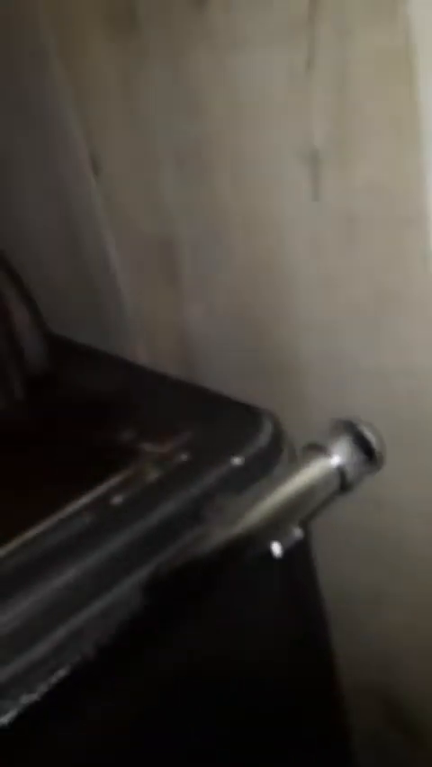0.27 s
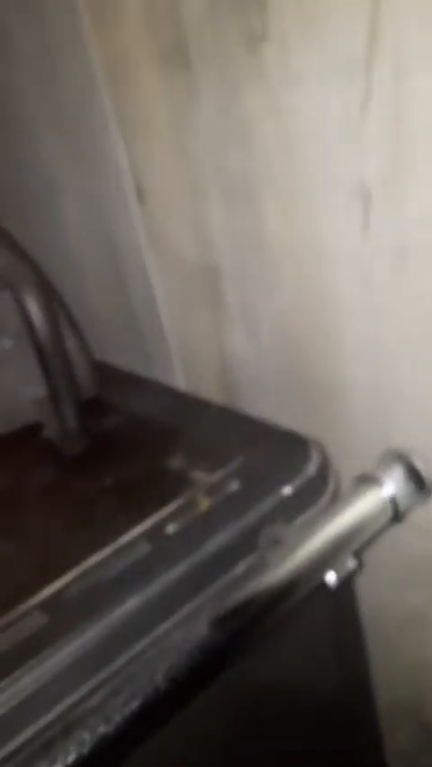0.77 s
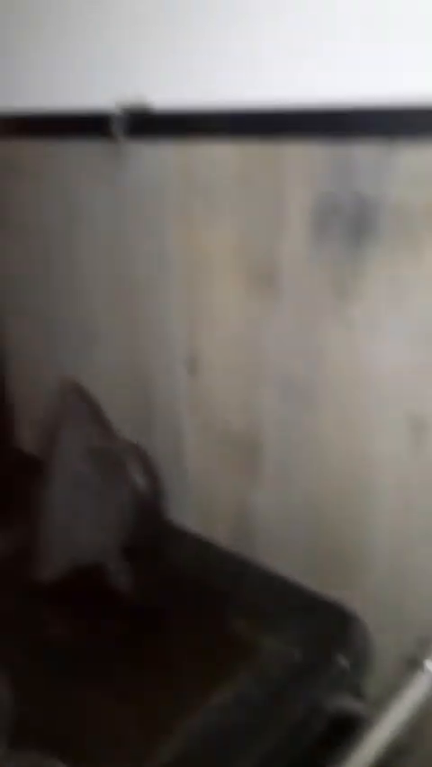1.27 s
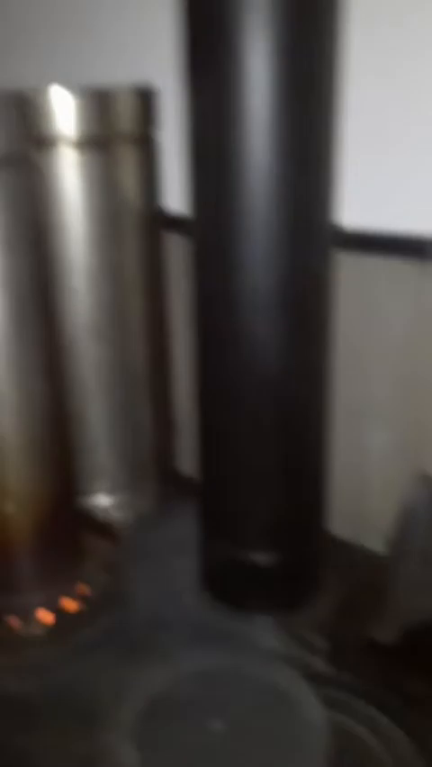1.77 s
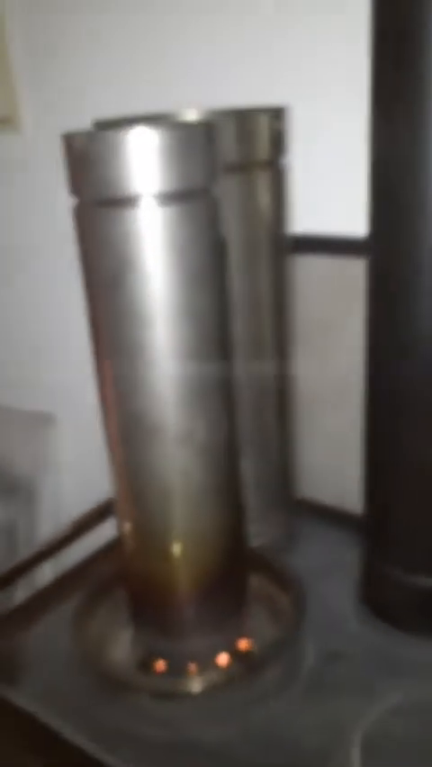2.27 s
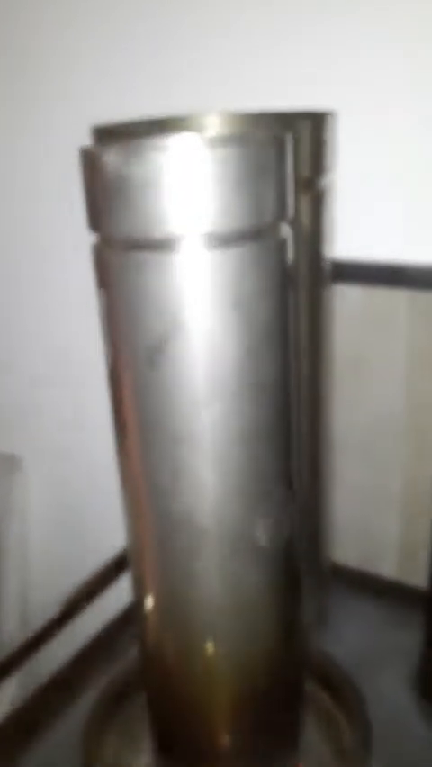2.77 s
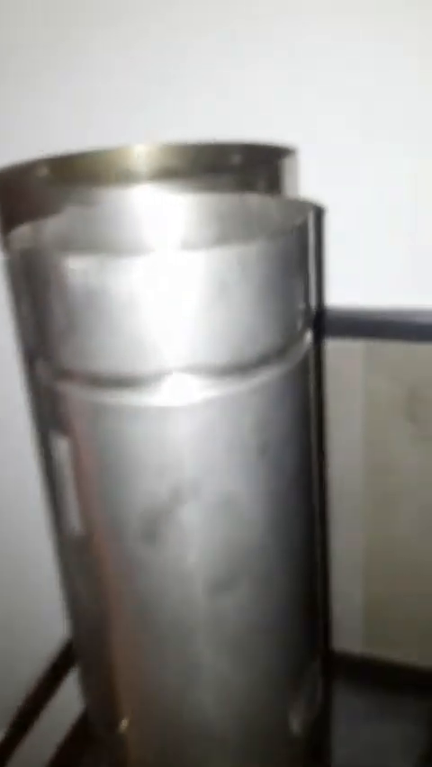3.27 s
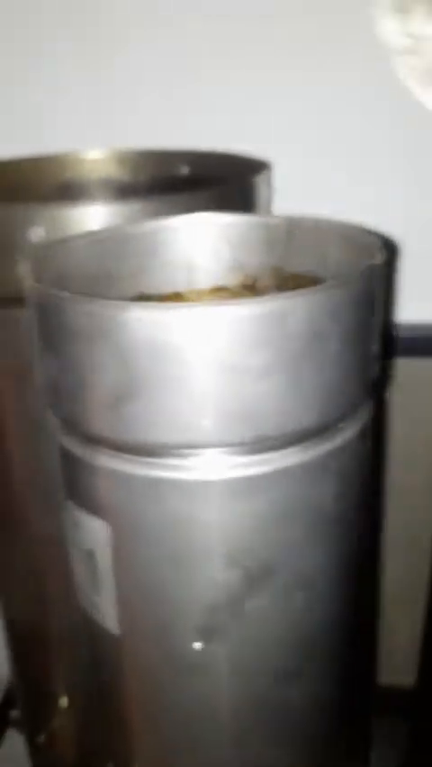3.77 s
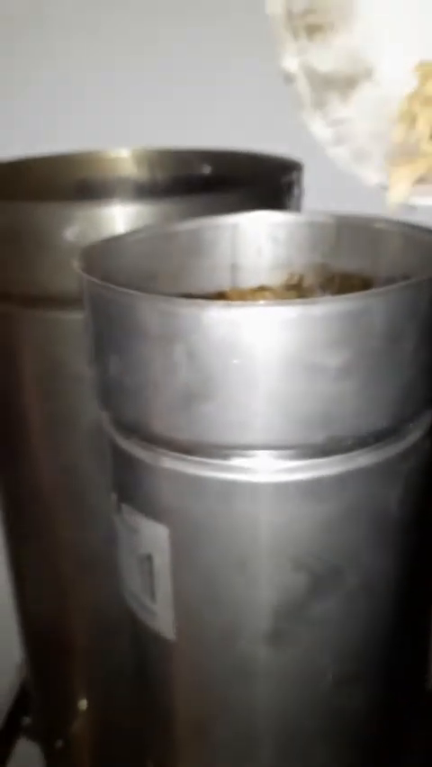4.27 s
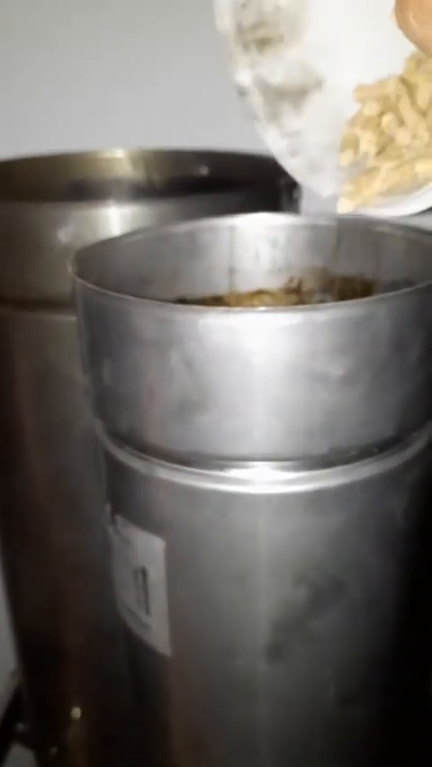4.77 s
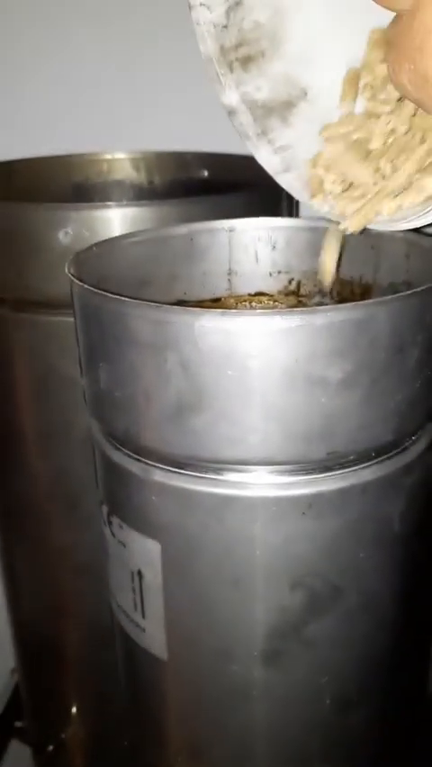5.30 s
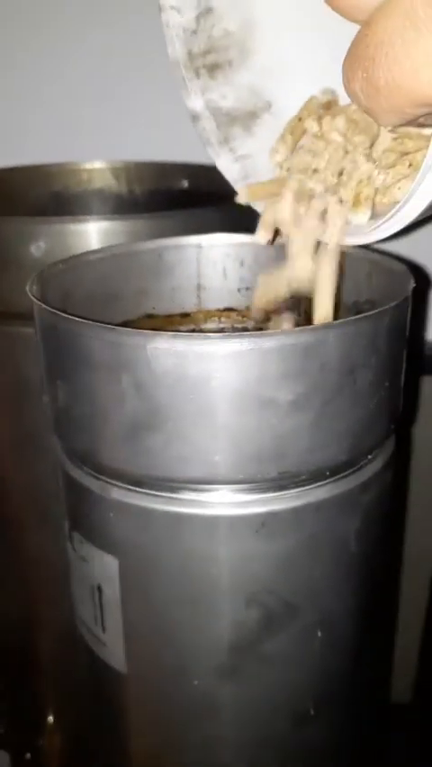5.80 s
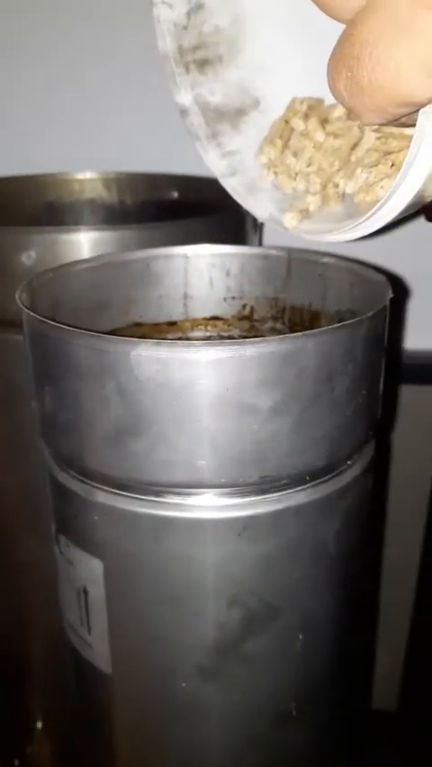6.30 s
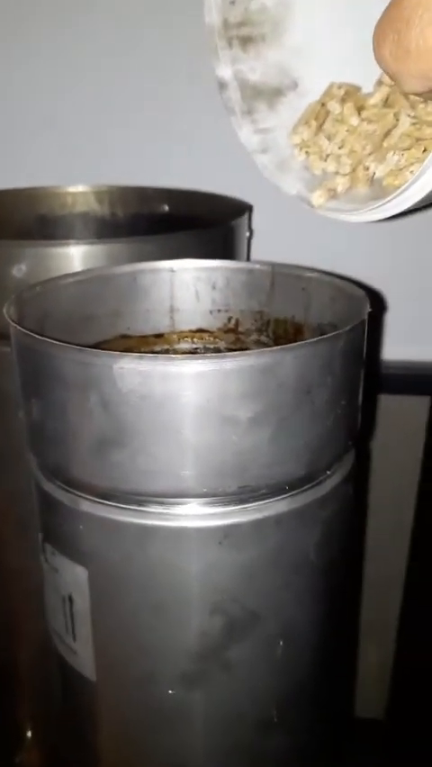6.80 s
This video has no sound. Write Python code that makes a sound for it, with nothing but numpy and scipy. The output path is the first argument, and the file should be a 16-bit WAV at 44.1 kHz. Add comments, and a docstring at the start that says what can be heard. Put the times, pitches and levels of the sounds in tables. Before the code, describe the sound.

Close stereo pickup in a small room: a hand digs through pellets, giving dense woody clatter and dull plastic thumps, fading within two seconds. Almost nothing follows while the bowl is carried. Then brighter, nearer clicking as pellets slide and settle, a stray metallic ping, and a brief brisk trickle into a steel tube, pellets tapping and ringing its wall before the last few fall and quiet returns.

```python
"""In a small hard room, dry wood pellets are scooped into a plastic bowl, carried, tipped and dropped.
They shift and click as bursts of filtered noise, and the bowl knocks and booms at its own pitches.
Then they drop into a thin steel tube; some strike its wall, which rings as fading sine waves over a noisy wash.
The room adds a fading noise echo and a faint steady floor. Two microphone ports a hand apart hear
the pellets and bowl at slightly different times."""
import sys
import numpy as np
from scipy import signal
from scipy.fft import rfft, irfft, next_fast_len
from scipy.io import wavfile
from scipy.ndimage import map_coordinates

SR = 44100
rng = np.random.default_rng(int(sys.argv[2]) if len(sys.argv) > 2 else 0)


def transcribe(u):
    """Save the signal u as a 16-bit wav file named by the first command-line argument.

    u: samples, shape (n,) or (channels, n), limited to [-1, 1]; the rate is SR.
    q: integer samples, one column per channel.
    """
    v = np.clip(np.atleast_2d(u).T, -1, 1)
    q = np.round(v * 32767).astype(np.int16)
    wavfile.write(sys.argv[1], SR, q)


N = 310777  # length in samples

# pellets on the move in the bowl: start_s, rattle_db, bowl_shake_db (over the rattle), treble_db (over the rattle)
PELLET_FLOW = [(0, -47.5, 0.5, -11), (.06, -31, -8.5, -16), (.38, -39, -3, -22.5), (.395, -26.5, 0, -26.5),
               (.418, -29.5, -5, -24), (.428, -23, -3.5, -21.5), (.66, -21, -2, -13),
               (.76, -37, -6.5, -17.5), (.84, -26, -7, -22.5), (.93, -34.5, -13.5, -26),
               (1.0, -32.5, -17, -15.5), (1.18, -33.5, -1, -9.5), (1.305, -44.5, 0, -20),
               (1.325, -41.5, -3, -23), (1.44, -48, -4, -23.5), (1.47, -48, -4, -26.5),
               (1.54, -57.5, -2, -26), (1.56, -53, -5, -34), (1.73, -73, -9, -9.5), (2.1, -88, -5, 5),
               (2.29, -88.5, -3.5, -10), (2.4, -82.5, 13, -22), (2.58, -79, -5, 2.5),
               (2.78, -73, 2.5, -0.5), (2.87, -76, -14, 6), (3.04, -61.5, -4.5, -7),
               (3.07, -51, 8.5, -20.5), (3.19, -67.5, 7, -11.5), (3.28, -54, -6, -19.5),
               (3.4, -53, 8.5, -8.5), (3.52, -56, 7.5, -18), (3.55, -36, -4, -19.5), (3.66, -40.5, -6, -19),
               (3.7, -36.5, -3, -23.5), (3.79, -41, -9, -19.5), (3.98, -42, -17, -23.5),
               (4.17, -40.5, -24, -15.5), (4.32, -45.5, -6.5, -17), (4.44, -38, -11.5, -28.5),
               (4.6, -40, -10, -22.5), (4.66, -41, -4.5, -19), (4.78, -45, -7, -17), (4.88, -52, -4.5, -26),
               (5.16, -62.5, -5.5, -16), (5.3, -49.5, -6, -9.5), (5.62, -44.5, -6, -14.5),
               (5.72, -36.5, -10, -12), (5.82, -34, -15.5, -3.5), (5.93, -33, -13, -5),
               (6.09, -32.5, -15, -11), (6.21, -42, -7.5, -2.5), (6.31, -51.5, -4.5, -10.5),
               (6.49, -55.5, -13, -6.5), (6.61, -66.5, -11, -30), (6.79, -78.5, -9, -0.5),
               (7.05, -100, -5, 23.5)]
# which side the bowl is held on: start_s, left_over_right_db
BOWL_SIDE = [(0, -0.5), (0.15, 0), (1.2, .3), (1.7, 1.5), (2.2, 0), (3.1, 1), (3.7, 3.5), (4.3, 4),
             (4.6, 1), (5.08, 1), (5.28, 5.5), (5.8, 0), (6.38, 1), (7.05, .5)]
# how loudly the air in the bowl booms: start_s, level_db
BOOM_LEVEL = [(0.0, -52.5), (0.29, -44), (0.35, -51.5), (0.49, -30.5), (0.68, -29), (0.78, -55.5),
              (0.84, -28.5), (0.88, -43), (1.12, -35), (1.74, -85.5), (2.29, -87.5), (2.39, -69),
              (2.94, -91.5), (3.06, -66), (3.16, -65.5), (3.73, -48.5), (4.51, -50), (5.59, -67),
              (5.69, -51.5), (6.22, -45.5), (6.55, -80.5), (7.05, -81)]
# share of the brighter rattle colour: start_s, share (0 to 1)
NEAR_SHARE = [(0, 0.1), (.3, 0.1), (.45, 0.07), (.6, .5), (.7, 0.36), (.85, 0.1), (1.1, 0.1), (1.3, 0.1),
              (1.6, 0.08), (2, 0.12), (3, .9), (4.5, 0.87), (5.3, 1), (5.9, 0.86), (7.05, 0.84)]
# ordinary rattle colour: pitch_hz, level_db (per Hz)
RATTLE_COLOUR = [(530, -33), (900, 4.5), (1180, -1.5), (1950, 0.5), (2750, -11.5), (3000, -9), (3970, -7),
                 (4910, -11.5), (8410, -26.5), (9000, -36), (11700, -47), (19800, -120)]
# brighter rattle colour, as close to the microphone: pitch_hz, level_db (per Hz)
NEAR_COLOUR = [(530, -15), (900, 2), (1240, 0), (1590, 4.5), (2340, 3), (2600, 1), (3270, 1), (3530, 0),
               (8020, -15), (9000, -32.5), (11700, -35.5), (19800, -120)]
# colour of the treble hiss: pitch_hz, level_db (per Hz)
FIZZ_COLOUR = [(3820, -22.5), (6500, -9.5), (8400, -3.5), (9620, -16.5), (11800, -5), (14300, -8),
               (15400, -10.5), (16000, -38.5)]
# air in the bowl: pitch_hz, width_hz, level_db
BOWL_AIR = [(312, 40, 0)]
# flexing of the plastic: pitch_hz, width_hz, level_db
BOWL_RIM = [(524, 160, 4.5), (638, 12, 8.5), (640, 210, 5), (923, 110, 1)]
SURGE_DB, SURGES_PER_S = 2.5, 14  # unevenness of the flow
CONTACTS_PER_S, SIZES_DB = 170, 3.5  # for each pellet length
BOWL_LEAN_DB = 1.6  # the shaking bowl is louder on the left


def stream():
    """Many small contacts: pellets of different lengths click at different pitches and shake the bowl."""
    flow_db, bowl_db, treble_db = curves(PELLET_FLOW)
    rattle_db = flow_db + SURGE_DB * wobble(SURGES_PER_S)
    fizz_db = rattle_db + treble_db
    rim_db = flow_db + bowl_db + 2.7 * wobble(16)
    boom_db = curves(BOOM_LEVEL)[0] + 1.8 * wobble(15)

    hits = 0
    for hz in np.geomspace(1100, 12000, 8):
        # the higher the pitch, the less alike the two ports
        taps = contacts(CONTACTS_PER_S, SIZES_DB, alike=0.64 * (1100 / hz) ** 0.6)
        hits = hits + unit(filtered(taps, resonances([(hz, 0.64 * hz, 0)]))) * np.sqrt(hz)

    near = np.clip(curves(NEAR_SHARE)[0], 0, 1)
    plain_rattle = unit(filtered(hits, colour(RATTLE_COLOUR)))
    near_rattle = unit(filtered(hits, colour(NEAR_COLOUR)))
    rattle = amp(rattle_db) * ((1 - near) * plain_rattle + near * near_rattle)
    dust = unit(hits) + 0.67 * rng.standard_normal((2, N))  # crumbs and dust slide along as a finer hiss
    fizz = amp(fizz_db) * unit(filtered(dust, colour(FIZZ_COLOUR)))

    shake = contacts(500, spread_db=3.5, alike=0.78)
    boom = filtered(shake, lambda f: resonances(BOWL_AIR)(f) * resonances([(310, 150, 0)])(f))
    rim = filtered(shake, lambda f: resonances(BOWL_RIM)(f) * resonances([(640, 500, 0)])(f))
    bowl = amp(boom_db) * unit(boom) + amp(rim_db) * unit(rim)
    return left_right(curves(BOWL_SIDE)[0]) * (rattle + fizz) + left_right(BOWL_LEAN_DB) * bowl


# single pellets clicking on each other: start_s, level_db, pitch_hz, edge_db (sharp treble edge against the body)
PELLET_CLICKS = [(0.0339, -30.5, 2516, -24), (0.0568, -21, 2000, -22.5), (0.1254, -30.5, 2012, -23),
                 (0.182, -26.5, 1985, -20.5), (0.2814, -22, 2057, -27.5), (0.3904, -28, 1958, -16.5),
                 (0.4254, -17, 2097, -22), (0.4331, -12, 1967, -24.5), (0.4594, -18, 2047, -25),
                 (0.5826, -13.5, 3064, -20.5), (0.5975, -10.5, 2996, -21), (0.6079, -9, 2294, -20),
                 (0.6612, -11, 1955, -24.5), (0.7993, -26, 2000, -23.5), (0.8154, -22.5, 1977, -23.5),
                 (0.9639, -26.5, 1860, -24.5), (0.9783, -17, 1908, -20), (1.0425, -18, 1970, -19.5),
                 (1.087, -20, 2258, -22), (1.1222, -26.5, 1910, -15), (1.1563, -23, 1878, -19.5),
                 (1.2156, -25.5, 1573, -18.5), (1.3145, -20.5, 2500, -22), (1.3155, -22, 5200, -15.5),
                 (1.3683, -26, 2320, -25.5), (1.3899, -32, 2340, -30.5), (1.4546, -31.5, 2020, -26.5),
                 (1.5481, -35, 2190, -22), (1.604, -49, 5500, -6.5), (1.777, -53.5, 3500, -19),
                 (2.1635, -59, 5030, -5), (3.0512, -30, 1496, -30.5), (3.054, -35, 2860, -30),
                 (3.148, -36, 1500, -37), (3.1662, -32.5, 2230, -33), (3.242, -37.5, 2600, -14),
                 (3.259, -17.5, 1410, -36), (3.2595, -25, 3380, -22), (3.2825, -25.5, 1710, -35),
                 (3.3243, -38, 1600, -36), (3.4518, -33, 3130, -26.5), (3.5048, -29.5, 2440, -20),
                 (3.533, -18, 2327, -20), (3.5368, -9.5, 3644, -21.5), (3.5642, -13, 2866, -20),
                 (3.5797, -15.5, 2448, -28), (3.5932, -21, 3790, -22), (3.63, -29, 1900, -30),
                 (3.6475, -30, 3000, -26), (3.6615, -35, 2800, -28), (3.6751, -19.5, 2970, -16),
                 (3.6895, -7.5, 2283, -16), (3.696, -16, 3076, -29), (3.7064, -17, 3020, -26),
                 (3.723, -14, 1611, -23), (3.7412, -23, 2960, -29.5), (3.7994, -23.5, 3274, -22),
                 (3.8095, -24.5, 2600, -24.5), (3.8175, -17, 1690, -33), (3.8412, -16, 2916, -21),
                 (3.8741, -24.5, 2330, -29.5), (3.8826, -27, 3800, -21), (3.8872, -25.5, 2580, -20),
                 (3.9046, -17.5, 3150, -16), (3.9142, -19.5, 3240, -28.5), (3.9543, -14, 3270, -25),
                 (3.9657, -18.5, 2770, -38.5), (4.0083, -19, 4160, -20), (4.0796, -29.5, 1630, -25),
                 (4.0867, -33, 1750, -21), (4.116, -23.5, 1613, -22), (4.1234, -26, 3040, -14),
                 (4.1356, -21.5, 3740, -13), (4.1433, -23.5, 3150, -23.5), (4.1581, -17, 3250, -23.5),
                 (4.1982, -22, 4425, -21.5), (4.2608, -26.5, 4130, -24.5), (4.3244, -24, 4250, -19),
                 (4.3326, -20.5, 2540, -17.5), (4.3384, -21, 3010, -8), (4.3841, -20.5, 3200, -18.5),
                 (4.4045, -16.5, 2150, -25.5), (4.4452, -16, 2937, -21), (4.4567, -15, 3320, -26),
                 (4.5052, -17, 3360, -14), (4.5329, -14, 2460, -25), (4.561, -23, 3310, -24),
                 (4.6053, -33.5, 3960, -21.5), (4.6124, -20, 2470, -24.5), (4.6275, -17, 3300, -2.5),
                 (4.8347, -30.5, 3300, -33.5), (4.857, -38, 3400, -30), (5.0211, -43, 3590, 1),
                 (5.0635, -30.5, 2780, -26.5), (5.2357, -35.5, 2900, -34.5), (5.259, -38, 3420, -20),
                 (5.3724, -34.5, 2570, -17), (5.4124, -27, 2830, -24), (5.442, -26.5, 3190, -24),
                 (5.5044, -31.5, 2200, -18), (5.5328, -30.5, 2277, -18), (5.5717, -27.5, 1820, -4.5),
                 (5.6079, -25.5, 4580, -22), (5.6438, -29.5, 4170, -20.5), (5.6585, -16, 5520, -3),
                 (5.6625, -19.5, 5970, -3), (5.7198, -19, 2044, -25.5), (5.7853, -24, 4970, -8.5),
                 (5.8167, -19.5, 4570, -12.5), (5.8468, -19.5, 5095, -16.5), (5.885, -24, 2000, -25),
                 (5.8995, -20, 5400, -10.5), (5.9504, -10, 5380, -15), (5.919, -21.5, 5400, -11),
                 (6.021, -20, 2826, -13.5), (6.035, -15.5, 5930, -11.5), (6.0676, -12.5, 1853, -14),
                 (6.1311, -24, 2413, -18), (6.2034, -30.5, 3120, -1.5), (6.2248, -28.5, 2677, -8.5),
                 (6.335, -31, 1810, -3.5), (6.356, -41.5, 5170, 2.5), (6.3679, -29.5, 1760, -3),
                 (6.4215, -34.5, 5500, -5.5), (6.4275, -28, 2680, -20), (6.4305, -28, 2990, -21),
                 (6.4365, -25, 2884, -20.5), (6.5017, -38, 3390, -25.5), (6.5844, -50.5, 2000, -26),
                 (6.6483, -35, 4410, -14.5), (6.9495, -50, 1500, 0)]
CLICK_LEAN = 1.2  # clicks lean further to the side than the rattle
CRACKLE_S = .012  # time for the crackle to fall by 60 dB


def clicks():
    """A blow and a few milliseconds of crackle in a wide band around the pellet's own pitch, with a sharp edge."""
    bus, t = np.zeros((2, N)), np.arange(1024) / SR
    f = np.fft.rfftfreq(len(t), 1 / SR)
    for s, db, hz, edge_db in np.vstack([PELLET_CLICKS, lesser_clicks()]):
        scatter = rng.standard_normal(len(t)) + .5 * rng.standard_normal((2, len(t)))
        crackle = scatter * (1 - np.exp(-t / 0.000067)) * amp(-60 * t / CRACKLE_S)
        blow = 2.6 * (t == 0)
        wide, narrow = resonances([(.85 * hz, 1.3 * hz, 0)])(f), resonances([(hz, .22 * hz, 1)])(f)
        body = (wide ** 2 + narrow ** 2) / (1 + 1j * f / 7000) ** 2  # wood is too soft to ring very high
        edge = resonances([(8200, 4500, 0)])(f) * amp(edge_db + 2.0)
        sound = irfft(rfft(crackle + blow) * (body + edge), len(t))
        lean_db = CLICK_LEAN * np.interp(s, *np.transpose(BOWL_SIDE))
        add(bus, s, amp(db + 3.5) * left_right(lean_db) * sound / np.abs(sound).max())
    return filtered(bus, lambda f: (1j * f / (900 + 1j * f)) ** 3)  # a pellet is too small to radiate bass


SPARE_PER_S, SPARE_DB = 70, 4  # lesser clicks: rate, highest level over the rattle


def lesser_clicks():
    """Random clicks whose strength follows the rattle."""
    u = rng.random((int(SPARE_PER_S * N / SR), 4))
    s = u[:, 0] * N / SR
    level_db = np.interp(s, *np.transpose(PELLET_FLOW)[:2]) + SPARE_DB - 8 * u[:, 1]
    pitch_hz = 1400 * 4 ** u[:, 2]
    edge_db = -28 + 12 * u[:, 3]
    return np.transpose([s, level_db, pitch_hz, edge_db])


# pellets knocking on the plastic: start_s, level_db, pitch_hz
BOWL_KNOCKS = [(0.291, -23.5, 577), (0.393, -30, 600), (0.427, -12.5, 613), (0.695, -16, 540),
               (0.79, -35, 910), (0.841, -15.5, 904), (0.98, -21, 594), (1.041, -23, 560),
               (1.084, -20.5, 573), (1.104, -19.5, 567), (1.124, -19, 555), (1.217, -18.5, 577),
               (1.283, -28, 500), (1.367, -29.5, 493), (1.406, -34, 457), (1.455, -28, 580),
               (1.549, -32, 617.5), (2.354, -57.5, 490), (2.759, -56.5, 590), (2.965, -46, 560),
               (3.052, -22, 560), (3.07, -28.5, 560), (3.088, -37, 565), (3.096, -36, 580),
               (3.242, -36, 560), (3.2602, -22, 545), (3.283, -45, 546), (3.454, -30.5, 577),
               (3.537, -26.5, 757), (3.566, -29, 650), (3.674, -29.5, 596), (3.699, -20.5, 580),
               (3.716, -24.5, 638), (3.791, -34, 597), (3.809, -28.5, 597), (3.819, -24, 690),
               (3.886, -29, 750), (3.935, -29.5, 375), (3.966, -28, 753), (4.009, -29, 660),
               (4.116, -31.5, 595), (4.157, -27.5, 703), (4.327, -34, 640), (4.408, -26, 614),
               (4.46, -31, 695), (4.572, -29.5, 590), (5.288, -42.5, 615), (5.678, -29, 814),
               (5.722, -28.5, 756), (5.771, -32, 820), (5.843, -32, 810), (5.919, -29, 925),
               (5.943, -28, 760), (6.367, -35, 830)]


def knocks():
    """A soft blow rings the plastic for a few cycles."""
    bus, t = np.zeros((2, N)), np.arange(4096) / SR
    swell = t / 0.0035 * np.exp(1 - t / 0.0017)
    for s, db, hz in BOWL_KNOCKS:
        add(bus, s, amp(db + 5.0) * left_right(2.4) * swell * np.sin(2 * np.pi * hz * t))
    return bus


# pellets striking the steel wall: start_s, level_db, brightness_db (per octave), ring_time (times the tabled times),
# blow_db (over the ring), then pairs for the modes that the blow favours: pitch_hz, gain_db
STEEL_STRIKES = [(4.6268, -12.5, 1, 1.4, 8, 1809, 8, 996, 6, 1610, 9, 3370, 5, 3800, 6, 2680, 4, 1288, 4, 2000, 5),
                 (4.9062, -33, 8, 1.2, 2, 3480, 9, 6210, 6, 5710, 7),
                 (5.0612, -29, -3, 1.3, 5, 1809, 10, 2520, 7, 2760, 15, 1288, 6, 3370, 6, 2885, 10, 750, 5),
                 (5.6683, -12.5, 1, .85, 1, 2000, 12, 3096, 9, 4356, 11),
                 (5.779, -23, 9, 1.2, 0, 2430, 4, 5210, 4, 6210, 4),
                 (5.8455, -23, 2.5, 1.1, 2, 2000, 4, 4356, 4, 5550, 5),
                 (5.8988, -22.5, 9, 1.2, 0, 2430, 5, 5550, 6, 6210, 4),
                 (5.9503, -12, 5, .85, 4, 4356, 9, 5550, 12, 6210, 9),
                 (6.0352, -22, 2, 1, 3, 2885, 6, 1927, 4, 6210, 10),
                 (6.0677, -14, 4.5, 1.1, 7, 2430, 6, 2000, 6, 4630, 8, 1288, 10),
                 (6.4265, -27.5, -1, 1.55, 2, 2680, 11, 2885, 10, 3480, 10, 2280, 5, 3370, 6),
                 (6.648, -33, -1, 1.5, 3, 1927, 10, 1288, 7, 4356, 15, 3800, 7, 2680, 5, 3096, 5, 2000, 5, 1400, 7),
                 (6.975, -76, -3, 3, 0, 1400, 14, 2280, 21)]
# clear modes of the tube wall: pitch_hz, level_db, fade_s (to fall by 60 dB, before ring_time)
TUBE_MODES = [(750, -12, .22), (960, -11, .27), (1288, -9, .27), (1400, -12, .6), (1610, -11, .5),
              (1809, -7, .33), (1927, -9, .25), (2000, -7, .22), (2280, -9, .25), (2430, -7, .28),
              (2520, -7, .36), (2680, -7, .24), (2760, -7, .15), (2885, -8, .13), (3096, -7, .32),
              (3370, -8, .25), (3480, -7, .2), (3800, -7, .21), (4356, -8, .21), (4630, -12, .16),
              (4920, -11, .2), (5210, -12, .15), (5550, -13, .13), (5710, -14, .15), (6210, -14, .16),
              (6700, -15, .18), (7400, -14, .16), (8180, -16, .18)]
# colour of its dense overtones: pitch_hz, level_db (per Hz)
WASH_COLOUR = [(150, -69), (250, -19), (735, -12.5), (875, -2), (971, -8.5), (1180, -23), (1260, -4.5),
               (1700, -7), (1850, -8), (3340, -1), (14400, -16), (16000, -31)]
# how long the overtones last: pitch_hz, fade_s (to fall by 60 dB, before ring_time and WASH_LASTS)
WASH_FADE = [(300, 0.97), (790, 0.66), (2090, 0.34), (5510, 0.48), (14600, 0.11)]
BLOW_S = .035  # time for the blow to fall by 60 dB against the ring
MODES_DB, WASH_LASTS = -1, .88  # level trim of the clear modes; the wash dies a little sooner
BEAT_HZ, TWIN_DB = 45, -5  # each mode has a weaker twin up to this far off
FADE_DB_PER_S2 = 200  # the ring dies ever faster
PING_LEAN_DB = 0.6  # left over right


def pings():
    """The tube wall rings with clear modes over a wash of dense overtones; each strike favours some modes."""
    bus, t = np.zeros((2, N)), np.arange(SR // 2) / SR
    mode_hz, count = np.transpose(TUBE_MODES)[0], len(TUBE_MODES)
    for s, db, tilt_db, ring, blow_db, *favoured in STEEL_STRIKES:
        bright = lambda f: amp(tilt_db * np.log2((f + 200) / 3000))
        fade = [(f, WASH_LASTS * ring * fade_s) for f, fade_s in WASH_FADE]
        wash = dying(fade, len(t), lambda f: colour(WASH_COLOUR)(f) * bright(f))
        wash = wash / np.sqrt(np.mean(wash[:, :SR // 50] ** 2))  # level set by the first 20 ms
        wash = wash * (1 + amp(blow_db - 60 * t / BLOW_S))  # the blow itself stands above the ring

        # close neighbours blur each mode
        wander = .022 * rng.standard_normal((count, 1, len(t))).cumsum(axis=2)
        start = rng.random((count, 2, 1, 1))
        port_shift = (2 * start[:, 1] - 1) * np.array([[1], [-1]])  # ports up to two radians apart
        phases = 2 * np.pi * start[:, 0] + port_shift + wander
        gains_db = rng.normal(-1.5, 2, count)
        for hz, gain_db in np.reshape(favoured, (-1, 2)):
            gains_db[np.abs(mode_hz - hz).argmin()] = gain_db
        beats = BEAT_HZ * rng.uniform(-1, 1, count)

        modes = 0
        for (f, level_db, fade_s), gain_db, phase, beat in zip(TUBE_MODES, gains_db, phases, beats):
            tone = np.sin(2 * np.pi * f * t + phase)
            twin = amp(TWIN_DB) * np.sin(2 * np.pi * (f + beat) * t - phase)
            modes = modes + amp(level_db + gain_db - 60 * t / (ring * fade_s)) * bright(f) * (tone + twin)

        onset = 1 - np.exp(-t / 0.00056)
        gain = amp(db - 14.0) * left_right(PING_LEAN_DB) * onset * amp(-FADE_DB_PER_S2 * t ** 2)
        add(bus, s, gain * wash)
        add(bus, s, gain * amp(MODES_DB) * modes, lagging=False)
    return bus


# room and stove resonances: pitch_hz, width_hz, level_db
LOW_RESONANCES = [(96, 13, -5), (125, 22, 0), (175.3, 3.3, 2.5), (226, 14, 2)]


def thuds():
    """Low thudding in the room and stove resonances and a rumble from the hand, almost alike at both ports."""
    thud_gain, rumble_gain = handling()
    pair = ports(rng.standard_normal(N)) * left_right(0.6) + 0.099 * rng.standard_normal((2, N))
    thud = filtered(filtered(pair, resonances(LOW_RESONANCES)), resonances([(133, 100, 0)]))
    pair = rng.standard_normal(N) + 0.28 * rng.standard_normal((2, N))
    rumble_colour = [(15, -38.5), (30, -9.5), (55, -7.0), (85, 0.0), (120, -26.5), (200, -120)]  # Hz, dB
    rumble = filtered(pair, colour(rumble_colour))
    return thud_gain * unit(thud) + rumble_gain * unit(rumble)


# the hand grips, scoops and shifts the bowl: start_s (of the hold), length_s (of the hold), thud_db, rumble_db
HAND_MOVES = [(0.065, 0.27, -40, -52.5), (0.43, 0.25, -26.5, -46.5), (1.0, 0.19, -41.5, -57.5),
              (1.66, 0.2, -76, -58.5), (2.397, 0.11, -76.5, -77), (3.04, 0.1, -88, -68.5),
              (3.36, 0.077, -77.5, -69), (3.74, 0.055, -57, -69.5), (3.898, 0.33, -55, -50),
              (4.41, 0.1, -55, -57.5), (4.72, 0.091, -65, -78.5), (4.98, 0.25, -59.5, -56),
              (5.711, 0.026, -66, -55), (5.826, 0.24, -58.5, -55.5), (6.2, 0.1, -59, -57.5),
              (6.424, 0.023, -74, -59)]
GRIP_DB_PER_S, LET_GO_DB_PER_S, LUMPS_DB = 401, 153, 0.5  # rise, fall, unevenness
CARRY_DB = -31.5  # thud and rumble that go with the flow, against the rattle


def handling():
    """Thud and rumble gains: each move of the hand rises fast, holds and dies away."""
    t = np.arange(N) / SR
    gains = amp(curves(PELLET_FLOW)[0] + CARRY_DB)
    for s, length, thud_db, rumble_db in HAND_MOVES:
        rise_db, fall_db = GRIP_DB_PER_S * (t - s), LET_GO_DB_PER_S * (s + length - t)
        shape_db = np.minimum(0, np.minimum(rise_db, fall_db))
        gains = gains + amp(shape_db + np.array([[thud_db], [rumble_db]]))
    return gains * amp(LUMPS_DB * np.array([wobble(18), wobble(6.2)]))


# a faint coloured rustle while the bowl is carried: start_s, level_db
RUSTLE_LEVEL = [(2.3, -96), (2.37, -78), (2.5, -78), (2.62, -82), (2.72, -78), (2.9, -84.5), (3.0, -100)]
# its bands: pitch_hz, width_hz, level_db (the filter is applied twice)
RUSTLE_COLOUR = [(1594, 230, -0.5), (2000, 260, 2), (3550, 460, 1.5)]


def rustle():
    """Fine grains in a few fixed bands, only heard in the lull."""
    level_db = np.interp(np.arange(N) / SR, *np.transpose(RUSTLE_LEVEL), left=-200, right=-200)
    grains = contacts(900, spread_db=2.5, alike=0.37)
    grains = filtered(grains, lambda f: resonances(RUSTLE_COLOUR)(f) ** 2)
    return amp(level_db + 1.5 * wobble(20)) * unit(grains)


# how long the room answers: pitch_hz, fade_s (to fall by 60 dB)
ROOM_FADE = [(200, 0.48), (1500, 0.33), (6000, 0.067), (14000, 0.056)]


def room(x):
    """Diffuse answer of the walls; long waves reach both ports alike."""
    mid, side = dying(ROOM_FADE, SR // 2)
    side = signal.sosfilt(signal.butter(1, 500, "high", fs=SR, output="sos"), side)
    tail = np.array([mid + side, mid - side])
    delayed = np.pad(x.mean(0), (200, 0))[None]  # the answer starts 200 samples late
    return signal.fftconvolve(delayed, tail / np.linalg.norm(tail[0]), axes=1)[:, :N]


# colour of the room tone: pitch_hz, level_db (per Hz)
FLOOR_COLOUR = [(15, -29), (25, -7), (64, 8), (206, -11.5), (301, -7), (463, -13.5), (1840, -31.5),
                (5880, -24.5), (9070, -25.5), (12200, -34), (16000, -17.5)]
FLOOR_DB = -70.5


def room_tone():
    """The faint steady floor: coloured noise, partly shared by the two ports."""
    pair = rng.standard_normal(N) + rng.standard_normal((2, N))
    return amp(FLOOR_DB) * unit(filtered(pair, colour(FLOOR_COLOUR)))


# direction of the bowl: start_s, left_trails_by (samples)
PORT_LAG = [(0, 17), (1.7, 16.5), (2.2, 4), (3.2, 10), (3.6, -10.5), (4.7, -11), (5.2, 8.5), (5.7, 4),
            (6.2, 15.5), (7.1, 13)]


def ports(shared):
    """One sound at both ports, the left early or late by the direction of the bowl."""
    at, lag = np.arange(N), np.round(curves(PORT_LAG)[0] / 2).astype(int)
    return np.array([shared[np.clip(at - lag, 0, N - 1)], shared[np.clip(at + lag, 0, N - 1)]])


def add(bus, s, pair, lagging=True):
    """Mix a stereo sound in at s seconds, the left port early or late by the direction of the bowl."""
    lag = lagging * round(np.interp(s, *np.transpose(PORT_LAG)) / 2)
    for ch, shift in enumerate((lag, -lag)):
        part = bus[ch, max(round(s * SR) + shift, 0):][:pair.shape[1]]
        part += pair[ch, :len(part)]


def contacts(per_second, spread_db, alike):
    """Random pellet contacts of uneven size; part of each port's sound comes from other pellets."""
    draw = np.clip(rng.standard_normal((3, N)), -2.3, 2.3)
    shared, left, right = amp(spread_db * draw) * (rng.random((3, N)) < per_second / SR)
    alike = np.clip(alike, 0, 1)
    return np.sqrt(alike) * ports(shared) + np.sqrt(1 - alike) * np.array([left, right])


def dying(t60, length, shape=lambda hz: 1):
    """Stereo noise of a given colour in which each frequency dies at its own speed."""
    hz, t, z = signal.stft(rng.standard_normal((2, length)), SR, nperseg=128)
    gain = amp(-60 * t / along(t60, hz)[:, None]) * np.reshape(shape(hz), (-1, 1))
    return signal.istft(z * gain, SR, nperseg=128)[1][:, :length]


def resonances(modes):
    """Sum of (Hz, width Hz, dB) resonances with alternating signs, as a response of frequency."""
    def response(f):
        total = 0
        for k, (hz, width, db) in enumerate(modes):
            total = total + (-1) ** k * amp(db) * 1j * f * width / (hz * hz - f * f + 1j * f * width)
        return total
    return response


def colour(points):
    """A smooth spectrum from (Hz, dB) points."""
    return lambda f: amp(along(points, f))


def filtered(x, response):
    """x times a complex response of frequency."""
    m = next_fast_len(N + 8192)
    return irfft(rfft(x, m) * response(np.fft.rfftfreq(m, 1 / SR)), m)[..., :N]


def along(points, hz):
    """Read (Hz, value) points on a log frequency axis."""
    f, v = np.transpose(points)
    return np.interp(np.log(hz + 1), np.log(f + 1), v)


def curves(rows):
    """One value per sample for each column after the time."""
    s, *cols = np.transpose(rows)
    return [np.interp(np.arange(N) / SR, s, c) for c in cols]


def wobble(rate):
    """A smooth random curve, rate knots a second."""
    return map_coordinates(rng.standard_normal(int(N * rate / SR) + 4), [np.arange(N) * rate / SR])


def amp(db):
    """Decibels to a plain gain."""
    return 10 ** (np.asarray(db) / 20)


def left_right(db):
    """Gains of the two ports that make the left louder than the right by db."""
    return amp(np.array([[.5], [-.5]]) * db)


def unit(x):
    """Scale to an average (RMS) level of one."""
    return x / np.sqrt(np.mean(x ** 2) + 1e-20)


def scene():
    """Pellets and bowl with the room's answer, then the tube, the hand, the rustle and the floor."""
    rush, ticks, taps = stream(), clicks(), knocks()
    walls = room(amp(-8.5) * rush + amp(-9.0) * ticks + amp(-3.0) * taps)
    return rush + ticks + taps + walls + pings() + thuds() + rustle() + room_tone()


TOP_HZ = 15700  # band limit


def record(dry):
    """The microphone fades out in the deep bass and nothing is kept above the band limit."""
    return filtered(dry, lambda hz: (1j * hz / (45 + 1j * hz)) ** 3 * (hz < TOP_HZ))


dry = scene()
out = record(dry)
transcribe(out)
```